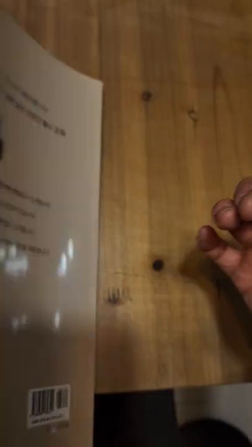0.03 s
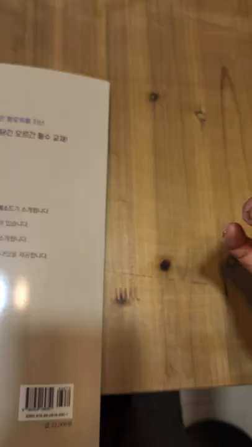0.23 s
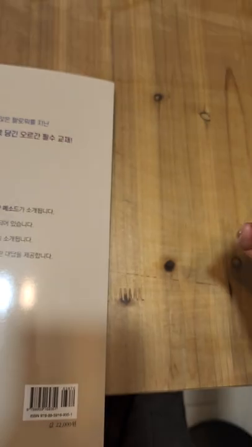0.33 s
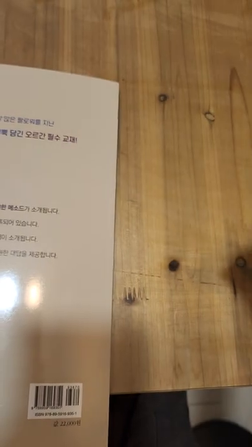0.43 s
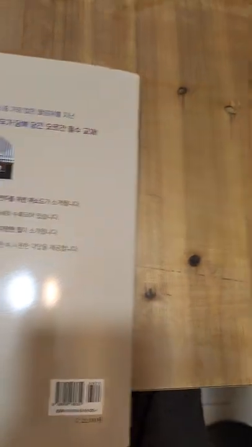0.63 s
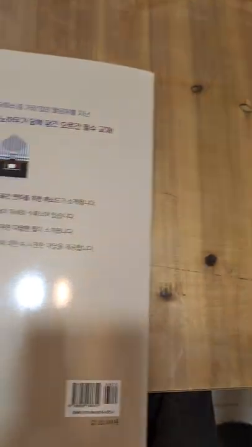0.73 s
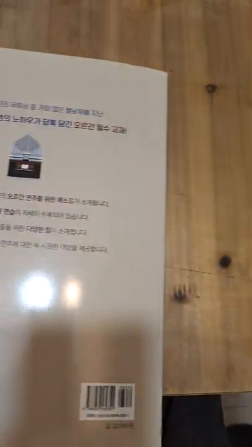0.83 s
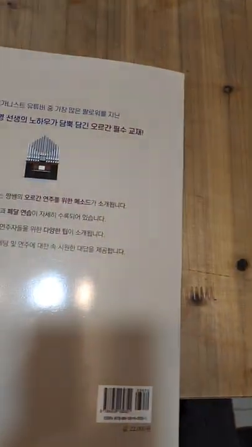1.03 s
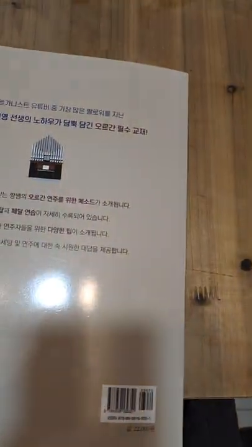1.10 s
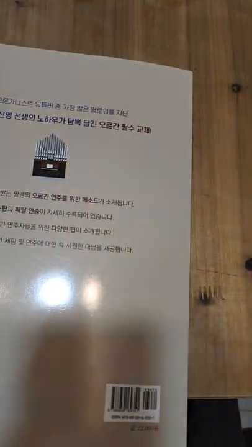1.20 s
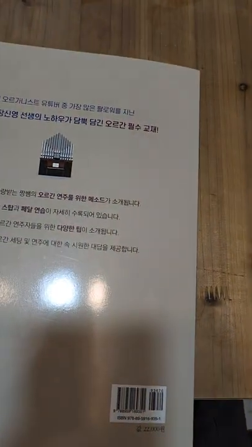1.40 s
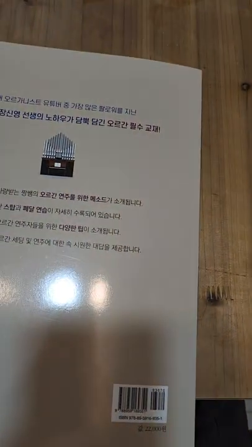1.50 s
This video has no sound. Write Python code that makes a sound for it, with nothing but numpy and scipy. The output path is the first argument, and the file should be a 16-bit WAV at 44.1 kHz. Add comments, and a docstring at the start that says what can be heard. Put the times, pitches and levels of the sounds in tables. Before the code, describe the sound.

A thick paperback falls shut on a wooden table with a soft, cushioned thump after a faint fading page swish; later one tiny crisp tick from the cover. Small room, quiet ventilation, close stereo microphones.

```python
"""Thick paperback falling shut

A thick paperback lies on a wooden table in a small room, heard close up: filtered noise makes its pages swish.
The back half falls shut on a cushion of air: a pressure pulse makes the soft thump, fading sines the ringing
table and room. Later the glossy cover gives one tiny tick, a noise burst after a faint rub.
Ventilation murmurs underneath: a rumble, a hollow duct note and a rush of air, all filtered noise."""
import sys
import numpy as np
from scipy import signal
from scipy.fft import rfft, irfft, next_fast_len
from scipy.io import wavfile
from scipy.ndimage import uniform_filter1d

SR = 44100
rng = np.random.default_rng(int(sys.argv[2]) if len(sys.argv) > 2 else 0)


def inscribe(sig):
    """Save sig as 16-bit PCM at rate SR to the path in sys.argv[1].

    A 1-D sig is mono; a 2-D sig holds one channel per row.
    Samples are clipped to [-1, 1] before scaling.
    """
    pcm = np.round(np.clip(np.atleast_2d(sig).T, -1, 1) * 32767)
    wavfile.write(sys.argv[1], SR, pcm.astype(np.int16))


N = 68355

# Tone of the swishing pages. Each row: frequency in Hz, relative level in dB.
SWISH_TONE = [(200, -9.5), (500, -3.5), (730, 10), (1000, -11), (1200, -4.5), (1550, 4), (2000, -8.5),
              (2500, -16.5), (3100, -11.5), (3800, -16.5), (4400, -11.5), (4950, -24), (6150, -19),
              (6600, -23.5), (7800, -23.5), (11000, -32.5), (15000, -32.5)]
SWISH_DB, SWISH_LIKENESS = -53.5, 0.15  # likeness: how alike both microphones are, 1 = the same
SWISH_T60_S, SWISH_TREBLE_T60_S = 0.42, 0.26  # time to fall by 60 dB; the treble dies sooner
SWISH_TREBLE_HZ = 5100
RUSTLE_DB, RUSTLE_PER_S = 2.4, 220  # typical size of the level changes, and changes per second


def pages():
    """The rustling swish of the last pages fades in the room, the treble first."""
    paper = waver(colour(noise_pair(SWISH_LIKENESS), SWISH_TONE), RUSTLE_DB, RUSTLE_PER_S)
    low_filter = signal.butter(3, SWISH_TREBLE_HZ, "low", fs=SR, output="sos")
    high_filter = signal.butter(3, SWISH_TREBLE_HZ, "high", fs=SR, output="sos")
    low = signal.sosfilt(low_filter, paper) * decay(0, SWISH_T60_S)
    high = signal.sosfilt(high_filter, paper) * decay(0, SWISH_TREBLE_T60_S)
    return undb(SWISH_DB) * (low + high)


# Ringing of book and table. Each row: frequency in Hz, level in dB, time to fall by 60 dB in seconds.
TABLE_MODES = [(34.3, -32, 0.094), (68.3, -36, 0.12), (170, -36.4, 0.11), (213.4, -32.5, 0.11),
               (254.3, -29, .06), (396, -41, 0.055), (590, -44, 0.046)]
# Standing waves of the room. Each row: frequency in Hz, level in dB, time to fall by 60 dB in seconds.
ROOM_WAVES = [(119, -37, .21), (182.3, -51, 0.44), (270.9, -49, 0.31), (308.5, -47.5, 0.25)]
# Tone of the knock as the halves meet. Each row: frequency in Hz, relative level in dB.
SLAP_TONE = [(150, -14.5), (380, 0), (600, 0), (800, -5.5), (920, -13.5), (1200, -10), (1700, -26.5),
             (2400, -37), (4000, -54), (15000, -70)]
# Tone of paper brushing on paper. Each row: frequency in Hz, relative level in dB.
BRUSH_TONE = [(1500, 3), (4000, -2), (6500, 1), (10000, -4.5), (15000, -18)]
CLOSE_S, CUSHION_S, CLOSE_DB = 0.20674, 0.00165, -17.5  # centre, half width and level of the pressure pulse
SETTLE_LAG_S, SETTLE_WIDTH_S, SETTLE_DB = 0.0166, 0.0034, -35.5  # the block of pages sinks after it
ROOM_RISE_S = 0.012  # the standing waves build up after the thump
SLAP_DB, SLAP_LEAD_S, SLAP_T60_S, SLAP_LEFT_DB = -23, 0.00021, 0.0053, 5
BRUSH_DB, BRUSH_LEAD_S, BRUSH_T60_S = -79.5, 0.0024, 0.045
THUMP_LEFT_DB = 1.1  # left microphone over right
THUMP_ROOM_DB, THUMP_ROOM_T60_S, THUMP_ROOM_LIKENESS = -30.5, 0.38, 0.92
SLAP_ROOM_DB = -4.5
EARLY_T60_S, ROOM_GAP_S = 0.08, 0.01  # also used by the tick


def closing():
    """An air-cushioned blow, knock and brush of paper, a short table ring and the lingering room hum."""
    blow = undb(CLOSE_DB) * puff(CLOSE_S, CUSHION_S)
    blow = blow + undb(SETTLE_DB) * puff(CLOSE_S + SETTLE_LAG_S, SETTLE_WIDTH_S)
    ring = ringing(TABLE_MODES, CLOSE_S, 2 * CUSHION_S) + ringing(ROOM_WAVES, CLOSE_S, ROOM_RISE_S)

    knock = burst(CLOSE_S - SLAP_LEAD_S, SLAP_T60_S, 1.0)
    slap = undb(SLAP_DB) * colour(knock, SLAP_TONE) * pan(SLAP_LEFT_DB)
    paper = noise_pair(0.5) * decay(CLOSE_S - BRUSH_LEAD_S, BRUSH_T60_S)
    brush = undb(BRUSH_DB) * colour(paper, BRUSH_TONE)

    walls = undb(THUMP_ROOM_DB) * room(blow, decay(ROOM_GAP_S, THUMP_ROOM_T60_S), THUMP_ROOM_LIKENESS)
    scatter = undb(SLAP_ROOM_DB) * room(slap[0], decay(0, EARLY_T60_S), 0)
    return (blow + ring) * pan(THUMP_LEFT_DB) + slap + brush + walls + scatter


# Tone of the tick of the cover. Each row: frequency in Hz, relative level in dB.
TICK_TONE = [(1000, -14), (2300, -12), (2950, -4), (3500, -6), (4400, -3), (5400, -5), (6600, 5), (8100, 0),
             (10000, 2), (13000, -1), (15000, -7), (16500, -22)]
# Tone of the tick scattered by table and walls. Each row: frequency in Hz, relative level in dB.
SCATTER_TONE = [(1500, -8), (3000, -2), (4300, -3), (5200, -6), (7000, 1), (10000, 0), (13000, -1),
                (15000, -3), (16500, -22)]
TICK_S, TICK_DB, TICK_T60_S = 0.7573, -25, 0.0035
TICK_LAG_S, TICK_LIKENESS = 0.00012, 0.8  # the right microphone hears it later
TICK_ECHO_S, TICK_ECHO_DB, TICK_ECHO_T60_S = 0.0077, -13, 0.012  # delay after the tick, level against it
EARLY_DB, LATE_DB, ROOM_T60_S = -61.5, -74.5, 0.37
SCATTER_ROUGH_DB, SCATTER_ROUGH_PER_S = 1.8, 300


def cover_tick():
    """The stiff cover crackles for a few milliseconds; a smeared near reflection and the room follow."""
    left, right = undb(TICK_DB) * colour(burst(TICK_S, TICK_T60_S, TICK_LIKENESS), TICK_TONE)
    tick = np.array([left, np.roll(right, int(TICK_LAG_S * SR))])
    smear = burst(TICK_S + TICK_ECHO_S, TICK_ECHO_T60_S, 0)
    echo = undb(TICK_DB + TICK_ECHO_DB) * colour(smear, TICK_TONE)

    tail = undb(EARLY_DB) * decay(TICK_S, EARLY_T60_S) + undb(LATE_DB) * decay(TICK_S, ROOM_T60_S)
    build_up = np.clip(since(TICK_S) / ROOM_GAP_S, 0, 1)
    scatter = colour(noise_pair(0) * tail * build_up, SCATTER_TONE)
    return tick + echo + waver(scatter, SCATTER_ROUGH_DB, SCATTER_ROUGH_PER_S)


# Tone of the faint rub of the cover. Each row: frequency in Hz, relative level in dB.
RUB_TONE = [(3000, -13.5), (7500, -2), (8300, -7), (9500, 0), (10800, -8), (15000, -9)]
RUB_DB, RUB_RISE_S = -85, 0.093  # level reached at the tick; it grows 2.7 times in each rise time


def cover_rub():
    """The cover creeps over the pages, its rub growing louder until it lets go at the tick."""
    t = since(TICK_S)
    swell = (t < 0) * np.exp(-np.abs(t) / RUB_RISE_S)
    return undb(RUB_DB) * colour(noise_pair(0.3) * swell, RUB_TONE)


# Tone of the ventilation rumble. Each row: frequency in Hz, relative level in dB.
RUMBLE_TONE = [(15, -3.5), (30, 17), (52, 2.5), (82, 15), (112, -4.5), (150, -4), (210, -9), (280, -13.5),
               (450, -8.5), (900, -53)]
# Course of the rumble. Each row: time in seconds, level in dB.
RUMBLE_COURSE = [(0, -59), (.3, -63), (.44, -58.5), (.6, -62.5), (.85, -62), (1.05, -65.5), (1.15, -65),
                 (1.4, -65.5), (1.55, -65.5)]
# Hollow note of the air duct. Each row: frequency in Hz, relative level in dB.
DUCT_TONE = [(100, -20), (160, -4.5), (212, 1), (255, -1), (300, -4), (400, -5), (800, -62)]
# Tone of the rush of air. Each row: frequency in Hz, relative level in dB.
AIR_TONE = [(60, -9), (200, -9), (400, -7), (520, -2.5), (660, 0), (830, 1.5), (1100, -8), (1270, -10.5),
            (1450, -8), (2100, -18.5), (2700, -28), (4500, -34.5), (6500, -44.5), (10000, -49),
            (15500, -45)]
# Course of the rush. Each row: time in seconds, level change below the split in dB, the same above it in dB.
AIR_COURSE = [(0, 0, 0), (.35, -1.5, 0), (.6, 2.5, 0), (.95, -2, 0.55), (1.25, -2, 1), (1.48, -1, 0.95)]
RUMBLE_LIKENESS, DUCT_DB = 0.99, -72
AIR_DB, AIR_LIKENESS, AIR_LEFT_DB = -62, 0.2, 1.36
AIR_WAVER_DB, AIR_WAVER_PER_S, AIR_SPLIT_HZ = 1.1, 14, 900


def ventilation():
    """A low rumble swells and eases under a hollow duct note and a rush of air whose colour drifts."""
    t = since(0)
    rumble_db = np.interp(t, *np.array(RUMBLE_COURSE).T)
    rumble = colour(noise_pair(RUMBLE_LIKENESS), RUMBLE_TONE) * undb(rumble_db)
    duct = undb(DUCT_DB) * colour(noise_pair(0.98), DUCT_TONE)

    rush = colour(noise_pair(AIR_LIKENESS), AIR_TONE)
    air = undb(AIR_DB) * waver(rush, AIR_WAVER_DB, AIR_WAVER_PER_S)
    low = signal.sosfiltfilt(signal.butter(4, AIR_SPLIT_HZ, fs=SR, output="sos"), air)
    high = air - low
    at, low_db, high_db = np.array(AIR_COURSE).T
    air = low * undb(np.interp(t, at, low_db)) + high * undb(np.interp(t, at, high_db))
    return rumble + duct + air * pan(AIR_LEFT_DB)


def puff(at, width):
    """Pressure of air squeezed out and stopped: a swell, a sharp dip and a swell."""
    u = since(at) / width
    return (u ** 2 - 1) * np.exp(-u ** 2 / 2)


def ringing(modes, start, rise):
    """Struck things ring at their own pitches: sines that come in gently and die away."""
    t = since(start)
    ring = sum(undb(db) * decay(start, t60) * np.sin(2 * np.pi * hz * t) for hz, db, t60 in modes)
    return (1 - np.exp(-(t / rise) ** 2)) * ring


def burst(start, t60, likeness):
    """A short crackle of unit energy for two microphones, evened out in spectrum."""
    spectrum = rfft(noise_pair(likeness) * decay(start, t60))
    power = np.abs(spectrum) ** 2
    even = spectrum / np.sqrt(power + power.mean() / 30)  # the added part spares the weakest frequencies
    return unit(irfft(even, N)) / np.sqrt(N)


def room(x, tail, likeness):
    """Dense reflections: the sound repeated by noise under a given envelope, of about unit energy."""
    response = noise_pair(likeness) * tail / np.sqrt(np.sum(tail ** 2))
    return signal.fftconvolve(x[None], response, axes=1)[:, :N]


def waver(x, depth_db, rate):
    """Every half octave swells and sinks by itself."""
    hz = np.maximum(np.fft.rfftfreq(N, 1 / SR), 1)
    place = np.clip(2 * np.log2(hz / 250), 0, 11)  # half octaves above 250 Hz
    spectrum = rfft(x)
    total = 0
    for k in range(12):
        band = irfft(spectrum * np.maximum(1 - np.abs(place - k), 0), N)
        total = total + band * undb(depth_db * walk(rate))
    return total


def walk(rate):
    """Random levels, each held 1 / rate seconds, then smoothed; spread near one."""
    hold = int(SR / rate)
    steps = np.repeat(rng.standard_normal(N // 50)[:N // hold + 1], hold)
    return 1.18 * uniform_filter1d(steps, hold)[:N]


def colour(x, points):
    """Filter through (Hz, dB) points that never sounds early and keeps the power of white noise."""
    hz, db = np.array(points).T
    size = 2 * next_fast_len(N)
    f = np.maximum(np.fft.rfftfreq(size, 1 / SR), 1)
    gain = unit(undb(np.interp(np.log(f), np.log(hz), db)))
    # Folding the cepstrum (the transform of the log gain) forward in time makes the filter causal.
    cepstrum = irfft(np.log(gain))
    cepstrum[1:size // 2] *= 2
    cepstrum[size // 2 + 1:] = 0
    return irfft(rfft(x, size) * np.exp(rfft(cepstrum)))[..., :N]


def noise_pair(likeness):
    """White noise for two microphones with a given correlation."""
    c = np.clip(likeness, -1, 1)
    mid, side = rng.standard_normal((2, N))
    return np.sqrt((1 + c) / 2) * mid + np.sqrt((1 - c) / 2) * np.array([side, -side])


def pan(left_db):
    """Gains of the two microphones for a level difference."""
    return undb(np.array([[left_db], [-left_db]]) / 2)


def decay(start, t60):
    """Sudden start, then 60 dB down in t60 seconds."""
    t = since(start)
    return (t >= 0) * np.exp(-np.log(1000) * np.maximum(t, 0) / t60)


def since(start):
    """Seconds since a moment."""
    return np.arange(N) / SR - start


def unit(x):
    """Scale to an rms (average strength) of one."""
    return x / np.sqrt(np.mean(x ** 2))


def undb(db):
    """Decibels to gain."""
    return 10 ** (np.asarray(db) / 20)


def scene():
    """Pages, thump, tick and rub over the ventilation."""
    return pages() + closing() + cover_tick() + cover_rub() + ventilation()


TOP_HZ = 15800


def record(dry):
    """The recorder steeply cuts the top of the treble."""
    return signal.sosfilt(signal.ellip(8, 0.2, 70, TOP_HZ, fs=SR, output="sos"), dry)


dry = scene()
out = record(dry)
inscribe(out)
```